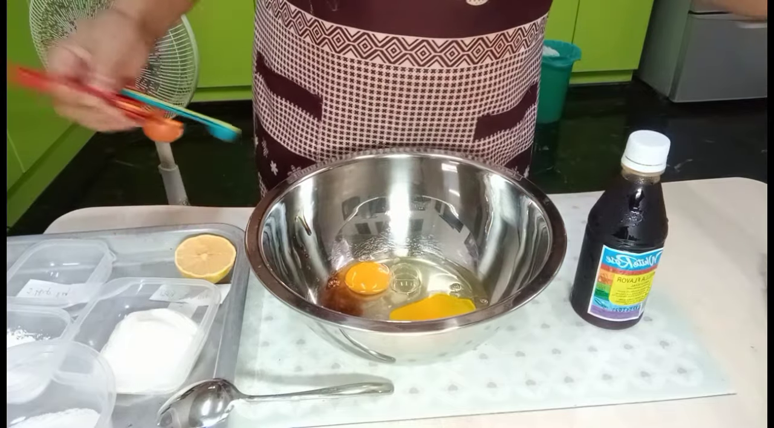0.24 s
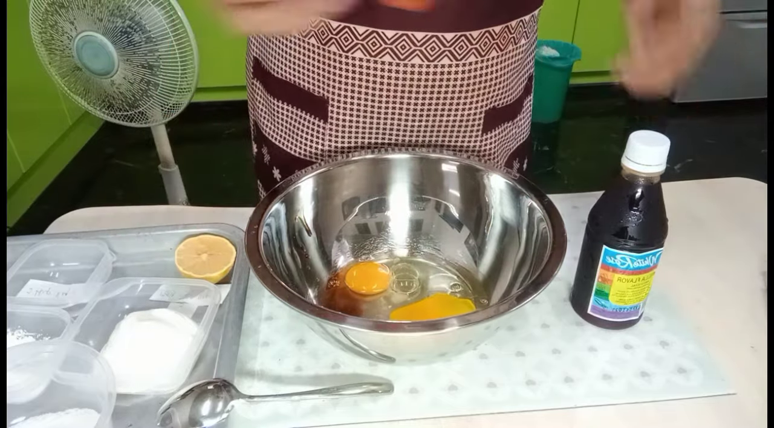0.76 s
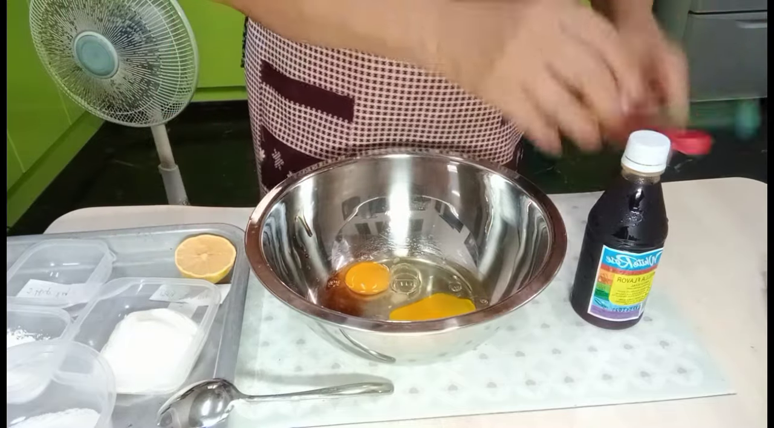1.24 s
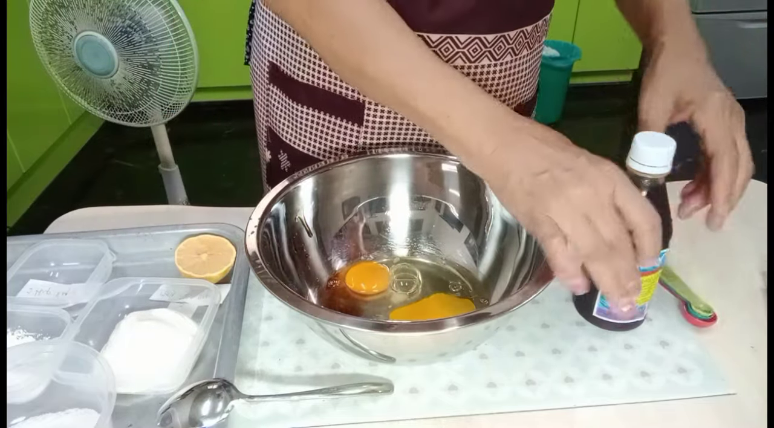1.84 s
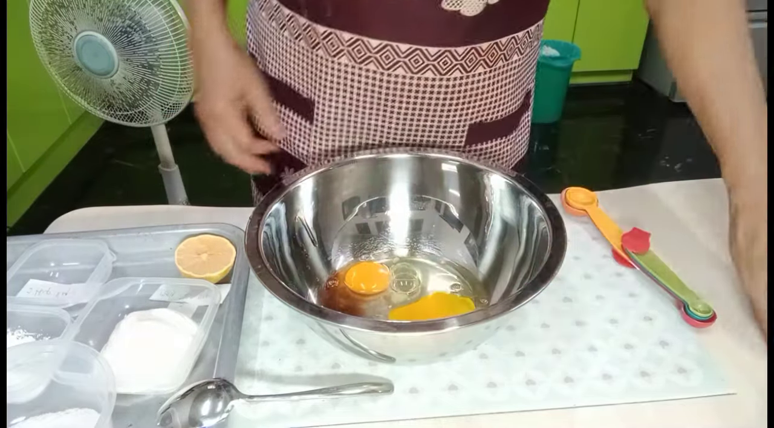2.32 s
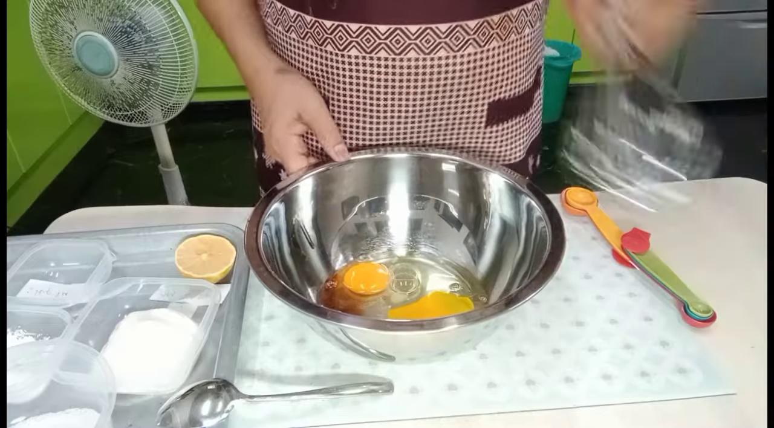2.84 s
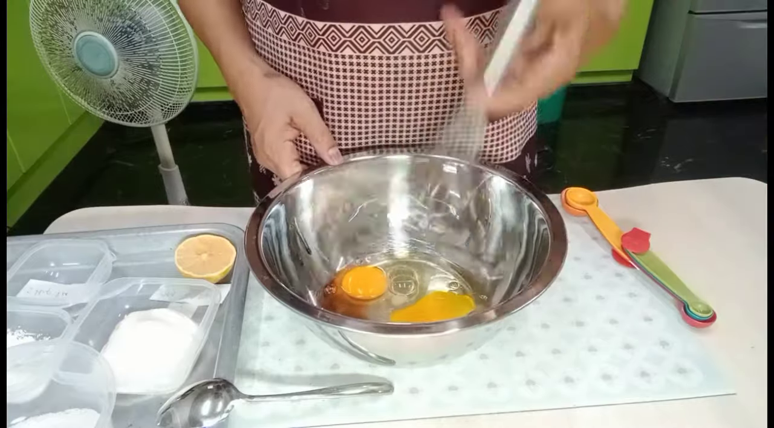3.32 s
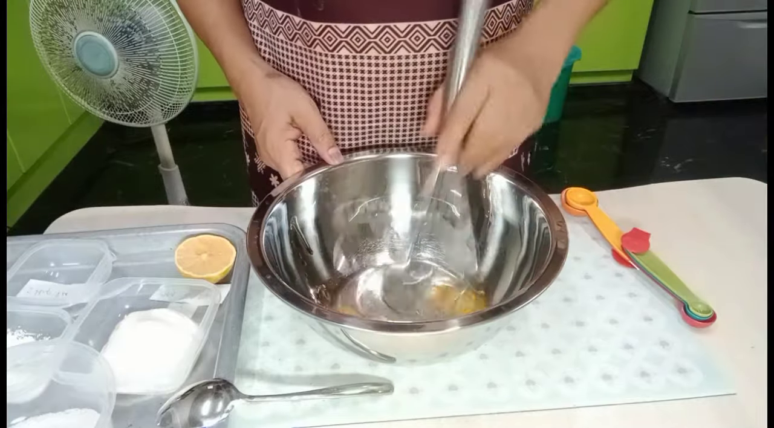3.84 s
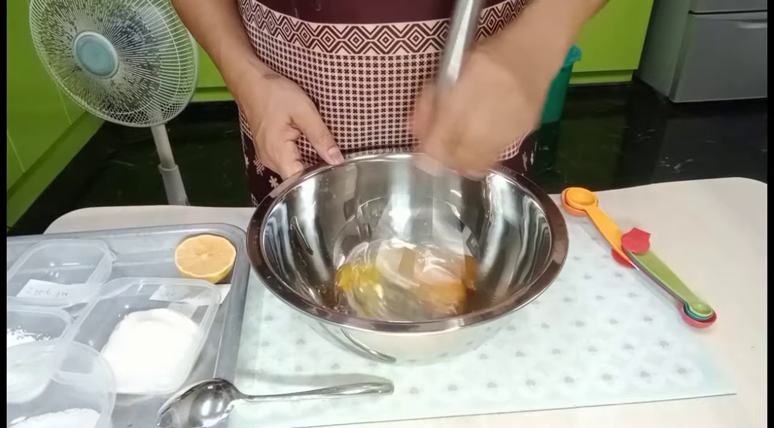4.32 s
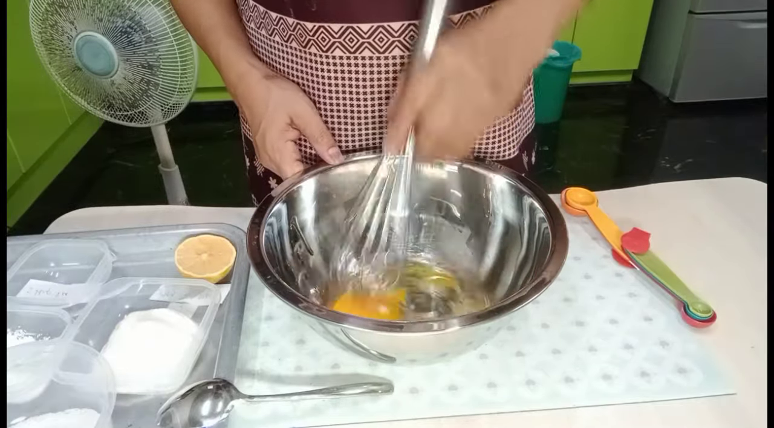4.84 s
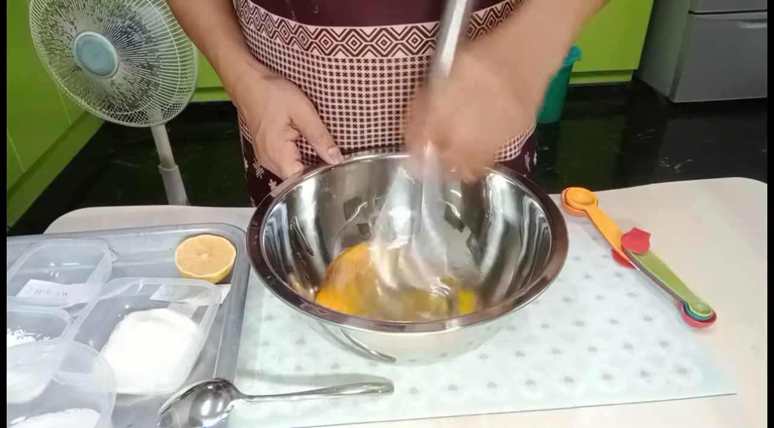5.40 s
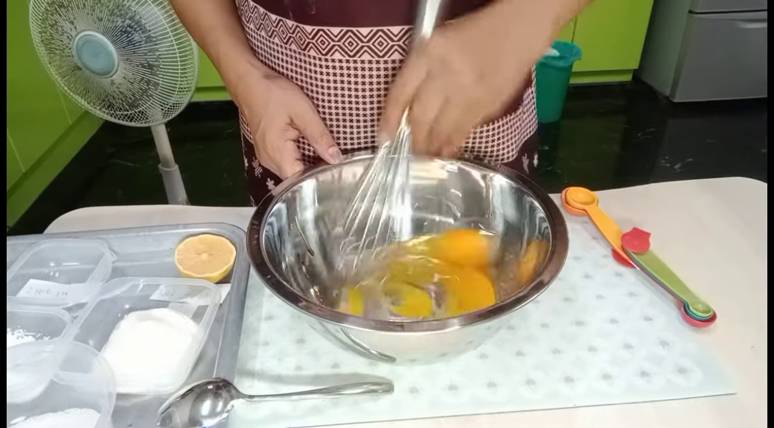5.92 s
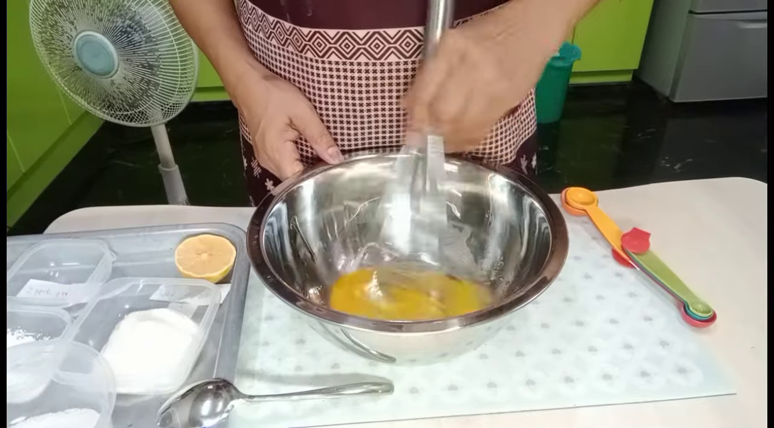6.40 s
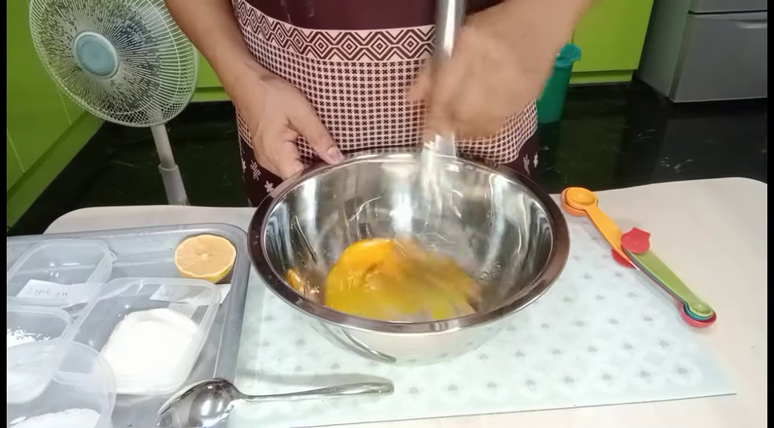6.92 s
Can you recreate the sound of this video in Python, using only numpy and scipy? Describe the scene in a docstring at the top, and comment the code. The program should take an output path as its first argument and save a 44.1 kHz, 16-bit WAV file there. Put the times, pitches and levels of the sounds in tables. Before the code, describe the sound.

A faint low fan hum throbs about three times a second under soft air and hiss, in a hard, reverberant kitchen heard closely in mono. A light plastic clack opens; small bright clicks come near 0.9 s, then a sharper clatter of plastic spoons on the table at 1.4-1.6 s. At 2.1 s a full bottle lands with a dull thud. A barely audible rustle passes at 2.5 s. At 3.2 s a wire whisk clangs loudly on a steel bowl, ringing bright and shimmering, with more blows and table knocks to 3.6 s. From 3.7 s it circles nearly four times a second, scraping and ticking while egg squelches and plops. Clinks are sparse and quiet until about 4.9 s, then more frequent and damped, with stronger knocks near 5.35, 5.8 and 6.7 s. Stirring continues to the end at 7 s, the squelch growing wetter.

```python
"""Whisking eggs in a steel bowl

In a hard-walled kitchen a fan hums and hisses (a throbbing tone under filtered noise); plastic spoons clack
on the table and a bottle thuds down (coloured flurries of tiny impacts). A wire whisk then clangs into a
steel bowl (decaying beating modes) and stirs: wires tick and scrape, the bowl knocks on the table,
and the egg squelches (noise and short damped tones) and plops (gliding tones)."""
import sys
import numpy as np
from scipy import signal
from scipy.fft import rfft, irfft, next_fast_len
from scipy.io import wavfile
from scipy.ndimage import uniform_filter1d, map_coordinates

SR = 44100
rng = np.random.default_rng(int(sys.argv[2]) if len(sys.argv) > 2 else 0)


def store_pcm(level_fs):
    """Save levels as 16-bit WAV."""
    pcm = np.round(np.clip(level_fs, -1, 1) * 32767).astype(np.int16)
    wavfile.write(sys.argv[1], SR, np.atleast_2d(pcm).T)


N = 315756
AGE = np.arange(SR) / SR  # seconds since a blow

# Colour of wire meeting steel. Each row: frequency in Hz, relative density in dB per Hz.
WIRE_CLASH_COLOUR = [(3500, -30.5), (4700, -23), (5300, -13), (5850, -6), (6200, -12), (6800, 4),
                     (7300, -3), (8000, -15), (9400, -8.5), (10500, -15.5), (12500, -30.5), (14000, -24.5),
                     (15200, -18), (16500, -22.5)]
# Colour of the bowl's base on the table. Each row: frequency in Hz, relative density in dB per Hz.
BASE_THUMP_COLOUR = [(40, -45), (90, -24), (150, -13), (190, -4), (250, 2), (300, -4), (350, 0), (430, -13),
                     (700, -30), (2000, -70)]
# Bright colour of a plastic edge. Each row: frequency in Hz, relative density in dB per Hz.
SPOON_EDGE_COLOUR = [(3800, -15), (4600, -14), (5300, 1), (6100, -7.5), (7200, 4), (8100, -7), (9300, -2),
                     (10500, -9), (12500, -19), (15000, -8.5), (16500, -23)]

# the whisk circles at a steady pace: first pass along the wall (s), time for one turn (s)
FIRST_PASS_S, TURN_S = 3.68, 0.277
# every strike of whisk on bowl: contact time at the wall (s)
CONTACT_S = 0.016


def amp(db):
    """Decibels to gain."""
    return 10 ** (np.asarray(db) / 20)


def unit(x):
    """Scale to rms 1."""
    return x / np.sqrt(np.mean(x ** 2) + 1e-20)


def blow(x):
    """Scale so that the first 30 ms have rms 1."""
    return x / np.sqrt(np.mean(x[:SR * 3 // 100] ** 2) + 1e-20)


def along(points, hz):
    """Read a curve of (Hz, value) points on a log frequency axis."""
    f, v = np.transpose(points)
    return np.interp(np.log(hz + 1), np.log(f + 1), v)


def curves(rows):
    """One value per sample for each column after the time."""
    s, *cols = np.transpose(rows)
    return [np.interp(np.arange(N) / SR, s, c) for c in cols]


def wobble(rate):
    """A smooth random curve with rate knots a second."""
    knots = rng.standard_normal(int(N * rate / SR) + 4)
    return map_coordinates(knots, [np.arange(N) * rate / SR])


def add(track, s, sound):
    """Mix a sound into the track at time s."""
    start = max(round(s * SR), 0)
    track[start:start + len(sound)] += sound[:max(N - start, 0)]


def coloured(x, points):
    """Causal (minimum-phase) filter with the given spectrum, built by folding its cepstrum."""
    m = 2 * next_fast_len(len(x) // 2 + 4096)
    gain = amp(along(points, np.fft.rfftfreq(m, 1 / SR)))
    cepstrum = irfft(np.log(gain), m)
    cepstrum[1:m // 2] *= 2
    cepstrum[m // 2 + 1:] = 0
    response = np.exp(rfft(cepstrum))
    return irfft(rfft(x, m) * response, m)[:len(x)]


def in_kitchen(x, wet_db):
    """The direct sound plus a fresh diffuse tail; each frequency dies at its own speed."""
    # Reverberation of the hard-walled room. Each row: frequency in Hz, t60 in seconds.
    room_decay = [(100, 0.4), (250, 0.21), (530, 0.51), (1400, 0.54), (3700, 0.71), (9700, 0.51),
                  (15000, 0.45)]
    hz, t, z = signal.stft(rng.standard_normal(SR * 3 // 4), SR, nperseg=256)
    decay = amp(-60 * t / along(room_decay, hz)[:, None])
    tail = signal.istft(z * decay, SR, nperseg=256)[1]
    tail *= 1 - np.exp(-np.arange(len(tail)) / SR / 0.0038)  # reflections build up over some 4 ms
    tail /= np.linalg.norm(tail)
    return x + amp(wet_db) * signal.fftconvolve(x, tail)[:len(x)]


def contact(length, spiky=.7):
    """A quick flurry of tiny impacts that swells and dies within about length seconds."""
    u = 3 * AGE / max(length, .001)
    impacts = rng.standard_normal(SR) * np.exp(spiky * rng.standard_normal(SR))
    return impacts * u * np.exp(-u)


def thud(colour, length, wet_db):
    """One dull contact in the room, with the colour of what is struck."""
    return blow(coloured(in_kitchen(contact(length), wet_db), colour))


def at_spot(x, spot_hz, favour_db):
    """The spot that is hit favours the modes around one pitch."""
    return coloured(x, [(spot_hz / 1.092, 0), (spot_hz, favour_db), (spot_hz * 1.16, 0)])


def ring(modes, rise, beat_hz):
    """Decaying modes; each beats at its own random rate, up to beat_hz."""
    hz, db, t60 = np.transpose(modes)[:, :, None]
    size = amp(db + rng.standard_normal(hz.shape))
    beat_cycles = beat_hz * rng.random(hz.shape) * AGE + rng.random(hz.shape)
    beating = 1 + .5 * np.cos(2 * np.pi * beat_cycles)
    tones = np.sin(2 * np.pi * (hz * AGE + rng.random(hz.shape)))
    waves = tones * np.exp(-np.log(1000) * AGE / t60)
    return np.sum(size * beating * waves, axis=0) * (1 - np.exp(-AGE / rise))


def grains(rate, pitch_hz, spread, cycles, size_db, glide):
    """Random short damped tones of uneven size whose pitch rises as they die."""
    count = int(rate * N / SR)
    t = AGE[:SR // 40]
    hz = pitch_hz * np.exp(spread * np.clip(rng.standard_normal((count, 1)), -2, 2))
    life = t * hz / cycles
    tones = np.sin(2 * np.pi * hz * t * (1 + glide * np.minimum(life, 2)))
    waves = tones * np.exp(-life) * (1 - np.exp(-t * hz))
    waves *= amp(size_db * np.minimum(rng.exponential(size=(count, 1)), 3))
    where = rng.integers(0, N, (count, 1)) + np.arange(len(t))
    return unit(np.bincount(where.ravel(), waves.ravel(), N)[:N])


def patchy(x, depth_db):
    """Random louder and softer patches, each about 170 Hz wide and 45 ms long, make the sound uneven."""
    z = signal.stft(x, nperseg=1024)[2]
    field = uniform_filter1d(rng.standard_normal(z.shape), size=4, axis=0)
    field = uniform_filter1d(field, size=4, axis=1)
    gain = amp(depth_db * np.clip(unit(field), -2, 2))
    return signal.istft(z * gain, nperseg=1024)[1][:len(x)]


def fan(waver_db=2, air_db=-54, hiss_db=-64.0):
    """A throbbing motor hum under a soft rush of air."""
    # The hum's slow rise and fall. Each row: time in seconds, mean level in dB.
    hum_level = [(0, -54.5), (1.1, -53), (2.4, -60), (3.0, -55), (4.5, -58.5), (7.1, -59)]
    # The low rush of air. Each row: frequency in Hz, relative density in dB per Hz.
    air_colour = [(25, -57), (70, -26), (100, -19.5), (150, -13), (230, -21), (320, -17.5), (420, -26.5),
                  (610, -21), (940, -27), (1270, -17), (1500, -28.5), (2700, -27.5), (3900, -27.5),
                  (5200, -86)]
    # The high hiss of the air. Each row: frequency in Hz, relative density in dB per Hz.
    hiss_colour = [(3000, -18), (3900, 1), (4350, -8), (4900, -8), (5700, -2), (6300, -4), (7400, 0),
                   (8200, -6), (9700, -5), (11500, -18), (13500, -21), (15200, -13), (16500, -25)]
    # pitch (Hz), throbs per second, time of one crest (s), swing above and below the mean (dB)
    hum_hz, throb_hz, throb_crest_s, swing_db = 117.5, 3.19, 3.0, 5.5
    t = np.arange(N) / SR
    level_db, = curves(hum_level)
    throb_db = swing_db * np.cos(2 * np.pi * throb_hz * (t - throb_crest_s)) + waver_db * wobble(14)
    hum = np.sqrt(2) * np.sin(2 * np.pi * hum_hz * t + 0.5 * wobble(9))
    rush = patchy(rng.standard_normal(N), depth_db=4.5)
    air = unit(coloured(rush, air_colour)) * amp(1.3 * wobble(4.61))
    hiss = unit(coloured(rng.standard_normal(N), hiss_colour))
    return amp(level_db + throb_db) * hum + amp(air_db) * air + amp(hiss_db) * hiss


def rustle(half=0.085, db=-62):
    """A faint brush of bright noise as the whisk is picked up."""
    pick_up_s = 2.53
    swell = np.exp(-((np.arange(N) / SR - pick_up_s) / half) ** 2)
    brush = unit(coloured(rng.standard_normal(N), SPOON_EDGE_COLOUR))
    return amp(db) * in_kitchen(swell * brush, wet_db=-5)


def bottle():
    """A full bottle is set down with a dull thud and rocks once."""
    # The heavy bottle on the table. Each row: frequency in Hz, relative density in dB per Hz.
    bottle_colour = [(30, -26), (65, -10), (120, 5), (190, -3.5), (270, -8), (470, -16.5), (640, -7),
                     (1000, -14), (2000, -32.5), (3500, -23.5), (4500, -42), (12000, -54)]
    out = np.zeros(N)
    # each row: start in seconds, level in dB, contact time in seconds
    for s, db, length in [(2.113, -32.5, 0.0064), (2.19, -55, 0.009)]:
        add(out, s, amp(db) * thud(bottle_colour, length, wet_db=3.5))
    return out


def spoons():
    """A bunch of plastic spoons clacks in the hand, then on the table; the room carries the tail."""
    # Plastic clacks. Each row: start in seconds, body level in dB, edge level in dB,
    # contact time in seconds, favoured pitch in Hz, lift of that pitch in dB.
    clacks = [(0.0, -40, -50, 0.014, 2000, 6), (0.922, -43.5, -39, 0.0083, 3480, 22),
              (0.948, -44, -39, 0.018, 2990, 13), (1.135, -54.5, -59, 0.0055, 3600, 1),
              (1.391, -27, -25.5, 0.0067, 7050, 6), (1.452, -35, -50, 0.021, 3460, 9),
              (1.507, -35.5, -33.5, 0.0075, 9700, 7), (1.591, -27, -22.5, 0.016, 9100, 8)]
    # Fuller colour of the plastic body. Each row: frequency in Hz, relative density in dB per Hz.
    body_colour = [(120, -72), (230, -1), (430, -17), (700, -3.5), (900, 1.5), (1270, 6), (1700, 0.5),
                   (2600, 3.5), (3500, 4), (4000, 5.5), (4600, -26), (6000, -34), (10000, -100)]
    out = np.zeros(N)
    for s, body_db, edge_db, length, spot_hz, favour_db in clacks:
        for colour, db in [(body_colour, body_db), (SPOON_EDGE_COLOUR, edge_db)]:
            # the room's answer builds from many unrelated paths
            tail = in_kitchen(contact(length), wet_db=7)
            clack = blow(contact(length)) + 1.07 * blow(tail)
            clack = at_spot(coloured(clack, colour), spot_hz, favour_db)
            add(out, s, amp(db) * blow(clack))
    return out


def gliding_tones():
    """Brief gliding, quivering tones: the egg plops, and once the bowl's wall rings low under a strike."""
    # Egg plops, and at 5.125 s the bowl wall's low ring. Each row: start in seconds, pitch in Hz,
    # peak of the direct tone in dB, glide in octaves per second over the first 30 ms.
    glides = [(3.860, 1593, -27, -4), (3.951, 1296, -32, -1.5), (4.083, 1690, -30.5, 7.5),
              (4.123, 1474, -36, 3.5), (4.834, 1167, -26, 5), (5.125, 657, -33, 3),
              (6.212, 878, -24.5, -5.5), (6.685, 584, -33, 7)]
    # time for a tone to swell to its peak (s), share by which its pitch quivers
    swell_s, warble = 0.0052, 0.046
    out = np.zeros(N)
    u = AGE / swell_s
    swell = (u * np.exp(1 - u)) ** 2
    for s, hz, db, glide in glides:
        pitch = hz * 2 ** (glide * np.minimum(AGE, .03)) * (1 + warble * wobble(304)[:SR])
        tone = np.sin(2 * np.pi * np.cumsum(pitch) / SR)
        add(out, s, amp(db) * in_kitchen(tone * swell, wet_db=-3))
    return out


def bowl_rocks(base_s=0.019, table_s=0.014, favour_db=9):
    """Hard strokes tip the bowl: its base thumps down and the table top booms."""
    # Each row: start in seconds, base thump in dB, thump pitch in Hz, table-top boom in dB.
    rocks = [(3.357, -44, 180, -32), (3.547, -33, 255, -54), (3.583, -42, 250, -41.5),
             (5.345, -27, 185, -46), (5.929, -37.5, 236, -54), (6.717, -24.5, 256, -49)]
    # The booming table top. Each row: frequency in Hz, relative density in dB per Hz.
    table_colour = [(30, -45), (60, -26), (92, -1), (125, 0), (170, -10), (300, -28), (800, -60)]
    out = np.zeros(N)
    for s, base_db, base_hz, table_db in rocks:
        thump = at_spot(thud(BASE_THUMP_COLOUR, base_s, wet_db=0.5), base_hz, favour_db)
        add(out, s, amp(base_db) * blow(thump))
        add(out, s, amp(table_db) * thud(table_colour, table_s, wet_db=2))
    return out


def passes(lag, half):
    """One smooth swell for each turn of the whisk, lag seconds after it meets the wall."""
    crests = np.arange(FIRST_PASS_S, N / SR, TURN_S)[:, None] + lag
    return np.exp(-((np.arange(N) / SR - crests) / half) ** 2).sum(axis=0)


def catches():
    """Single wires catch on the wall now and then: sparse ticks of uneven size, 2 ms decay."""
    catch_rate = 40  # per second, on average
    hits = (rng.random(N) < catch_rate / SR) * rng.random(N)
    decays = signal.lfilter([1], [1, -np.exp(-1 / (.002 * SR))], hits)
    return unit(decays * rng.standard_normal(N))


def stirring(scrape_db=-57, squelch_db=-53, uneven_db=2):
    """With each turn the wires skid over wet steel in tiny ticks and the egg squelches after them."""
    # How hard the hand stirs. Each row: time in seconds, wire scrape in dB, egg squelch in dB.
    effort = [(3.68, -36.5, -52), (4.23, -50.5, -54.5), (4.51, -45, -50), (4.79, -54, -61),
              (5.07, -59, -52), (5.34, -48, -48.5), (6.17, -59, -48), (6.73, -41, -48), (7.0, -48.5, -38.5)]
    # The wet egg. Each row: frequency in Hz, relative density in dB per Hz.
    egg_colour = [(110, -12), (180, 12), (256, -30), (305, -2), (471, -8.5), (586, -1), (728, -11.5),
                  (1220, 4.5), (1390, 1.5), (1510, 0), (2570, -3.5), (3510, 3.5), (4600, -20.5),
                  (5980, -77), (10100, -120)]
    # a pass: half length of the scrape, the egg's delay behind it, half length of the squelch (s)
    scrape_s, egg_lag_s, squelch_s = 0.061, 0.045, 0.081
    catch_db = -6  # against the steady ticks
    # a steady bed fades in over the turn before the first pass
    in_egg = np.clip((np.arange(N) / SR - FIRST_PASS_S) / TURN_S + 1, 0, 1)
    wire_db, egg_db = curves(effort)
    scrape = amp(scrape_db) * in_egg
    scrape = scrape + amp(wire_db + uneven_db * wobble(25)) * passes(0, scrape_s)
    squelch = amp(squelch_db) * in_egg + amp(egg_db) * passes(egg_lag_s, squelch_s)
    # about 9000 ticks a second
    ticks = rng.standard_normal(N) * (rng.random(N) < 9000 / SR) * amp(1.5 * wobble(70))
    ticks = unit(ticks) + amp(catch_db) * catches()
    bubbles = grains(rate=300, pitch_hz=814.3, spread=0.598, cycles=6.7, size_db=1.0, glide=0.035)
    slosh = rng.standard_normal(N) * amp(6.0 * wobble(55))
    # random patches of louder and softer pitch make scrape and squelch uneven
    wires = unit(coloured(patchy(ticks, depth_db=3), WIRE_CLASH_COLOUR))
    egg = unit(coloured(patchy(bubbles + slosh, depth_db=4.5), egg_colour))
    return in_kitchen(scrape * wires + squelch * egg, wet_db=-2)


def snap(length=0.0065, lowest_hz=8500):
    """The first dry snap of wire on steel: a brief bright crack of high-passed impacts."""
    highpass = signal.butter(4, lowest_hz, "high", fs=SR, output="sos")
    return blow(signal.sosfilt(highpass, contact(length)))


def wire_clash(free_db, wire_ring_db=-5):
    """The wires clash on steel with a snap, and their loops sing as beating high modes."""
    # The wire loops' modes. Each row: frequency in Hz, level in dB, t60 in seconds.
    loops = [(5782, 0, .5), (5870, -6, .4), (6548, -1, .6), (6712, -4, .5), (6735, -5, .5), (6889, -1, .6),
             (7009, -3, .5), (7140, -7, .4), (7219, -7, .5), (7294, -7, .5), (7440, -7, .4), (7540, -4, .5),
             (8436, -9, .35), (8845, -9, .4), (9044, -6, .4), (9607, 0, .35), (9969, -5, .35),
             (14900, -14, .2)]
    wire_contact_s, snap_db = 0.014, -15.5  # the snap's level is against the clash
    clash = in_kitchen(contact(wire_contact_s), wet_db=1)
    clash = blow(coloured(clash, WIRE_CLASH_COLOUR))
    song = blow(in_kitchen(ring(loops, rise=CONTACT_S / 2, beat_hz=45.4), wet_db=-3))
    return blow(clash + amp(snap_db) * snap() + amp(free_db + wire_ring_db) * song)


def wall_clang(free_db, near_rim, spot_hz, rim_ring_db=2):
    """The bowl's wall knocks and its modes ring, weighted by where the blow lands."""
    # The wall's modes. Each row: frequency in Hz, level when struck near the rim in dB,
    # level when struck near the base in dB, t60 in seconds.
    wall_modes = [(350, -10, -12, .35), (430, -25, -13, .35), (619, -9, -3, .4), (791, -14, -5, .4),
                  (897, -5, -11, .9), (1067, -20, -6, .5), (1125, -20, -5, .4), (1230, -13, -4, .45),
                  (1357, -4, -8, 1.1), (1511, 0, -5, .6), (1640, -18, -11, .4), (1873, -5, -15, .55),
                  (2100, -17, -7, .5), (2450, -22, -8, .4), (2643, -2, -8, .55), (3182, -20, -7, .45),
                  (3370, -12, -13, .45), (3730, -11, -4, .3), (3908, -5, -14, .3)]
    # Colour of the knock on the wall. Each row: frequency in Hz, relative density in dB per Hz.
    knock_colour = [(250, -19.5), (500, 4), (650, 4), (950, -1), (1250, 7), (1750, -6.5), (2300, -5),
                    (2900, -7.5), (3600, 1.5), (4000, -1.5), (4400, -31), (6000, -19), (10000, -100)]
    modes = [(hz, rim if near_rim else base, t60) for hz, rim, base, t60 in wall_modes]
    ring_db = free_db + rim_ring_db if near_rim else free_db
    knock = blow(coloured(in_kitchen(contact(CONTACT_S), wet_db=-2.0), knock_colour))
    # each blow adds a short clunk of quickly damped modes, each tuned up to 6 % lower at random
    damped = [(hz * rng.uniform(.94, 1), db, .12) for hz, db, t60 in modes]
    clunk = blow(in_kitchen(ring(damped, rise=CONTACT_S / 4, beat_hz=9), wet_db=-3))
    clang = blow(in_kitchen(ring(modes, rise=CONTACT_S / 4, beat_hz=6.7), wet_db=-24))
    return blow(at_spot(knock + .8 * clunk + amp(ring_db) * clang, spot_hz, favour_db=14))


def whisk_strikes():
    """The wires clash and sing, the bowl's wall rings, and its base thumps along."""
    # Whisk meets bowl. Each row: start in seconds, wires in dB, wall in dB, pitch favoured by the spot in Hz.
    strikes = [(3.225, -12, -19.5, 4140), (3.355, -20, -17, 1129), (3.547, -23.5, -30, 880),
               (3.577, -21, -26, 1180), (3.749, -37, -37, 585), (3.932, -34, -44.5, 1340),
               (4.904, -46.5, -48, 1190), (5.021, -46, -51, 3580), (5.119, -39, -35, 626),
               (5.312, -39, -36.5, 594), (5.345, -27.5, -30, 840), (5.564, -40, -36.5, 602),
               (5.657, -45, -48.5, 544), (5.793, -26.5, -35.5, 786), (5.802, -21.5, -26.5, 2304),
               (5.929, -32.5, -32, 663), (6.192, -44, -43, 3400), (6.419, -40.5, -44.5, 574),
               (6.717, -20.5, -24, 3300), (6.77, -28, -29, 1307), (6.985, -43, -37, 1244)]
    # egg coats the wires: ring when dry (dB), ring when coated (dB), time constant of coating (s)
    dry_ring_db, coated_ring_db, coating_s = -2.5, -14, 0.93
    thump_db = -14.5  # base against the wall's level
    out = np.zeros(N)
    for k, (s, wires_db, wall_db, spot_hz) in enumerate(strikes):
        # dry wires ring freely; the egg damps the later strikes
        dryness = np.exp(-(s - strikes[0][0]) / coating_s)
        free_db = coated_ring_db + (dry_ring_db - coated_ring_db) * dryness
        add(out, s, amp(wires_db) * wire_clash(free_db))
        # the first blow lands near the rim, the others low in the bowl
        add(out, s, amp(wall_db) * wall_clang(free_db, k == 0, spot_hz))
        add(out, s, amp(wall_db + thump_db) * thud(BASE_THUMP_COLOUR, CONTACT_S, wet_db=6.0))
    return out


def scene():
    """Everything at the table, summed into one channel."""
    background = fan() + rustle() + bottle() + spoons()
    whisking = gliding_tones() + bowl_rocks() + stirring() + whisk_strikes()
    return (background + whisking)[None]


def record(dry):
    """The recorder clips at full scale and cuts steeply above its band limit."""
    top_hz = 15600
    band_limit = signal.cheby1(14, .1, top_hz, fs=SR, output="sos")
    return signal.sosfilt(band_limit, np.clip(dry, -1, 1))


dry = scene()
out = record(dry)
store_pcm(out)
```